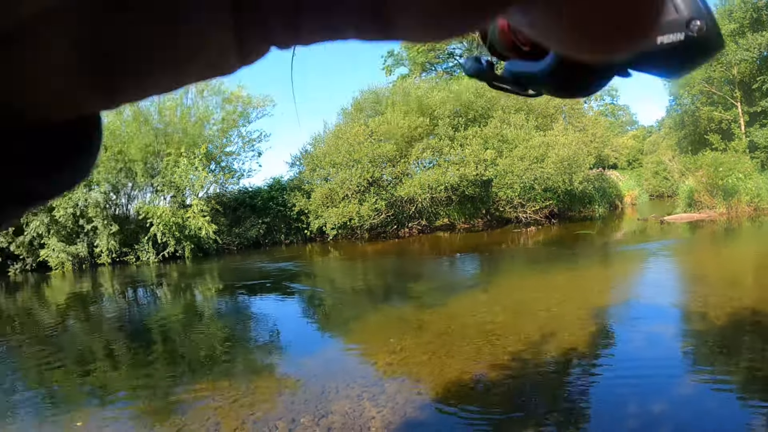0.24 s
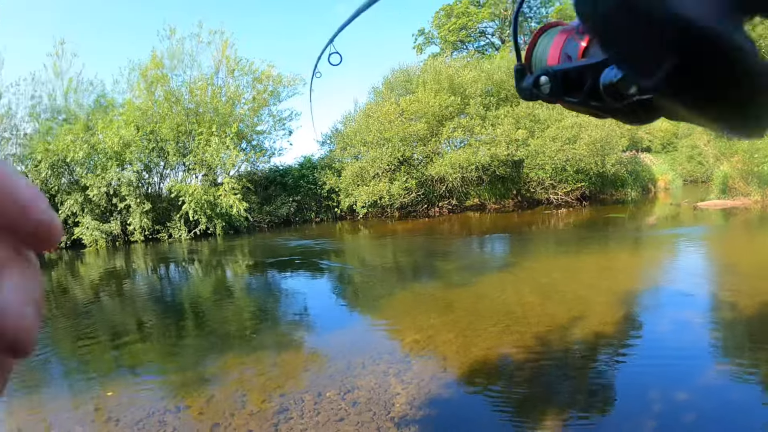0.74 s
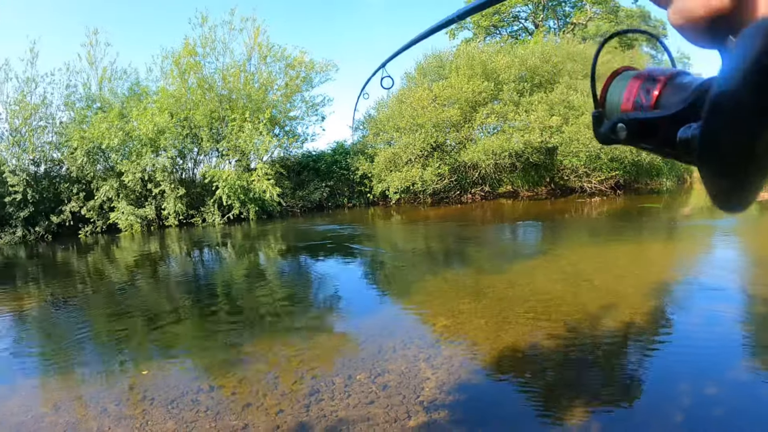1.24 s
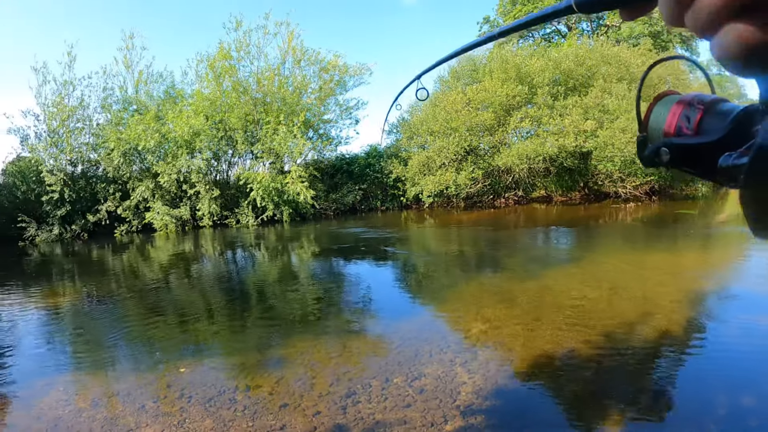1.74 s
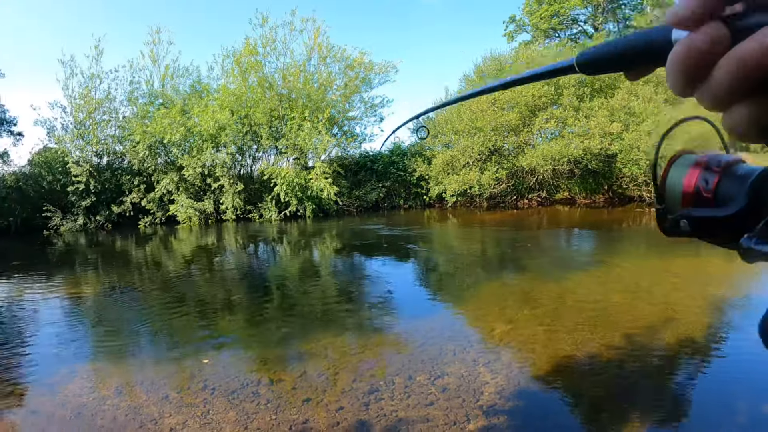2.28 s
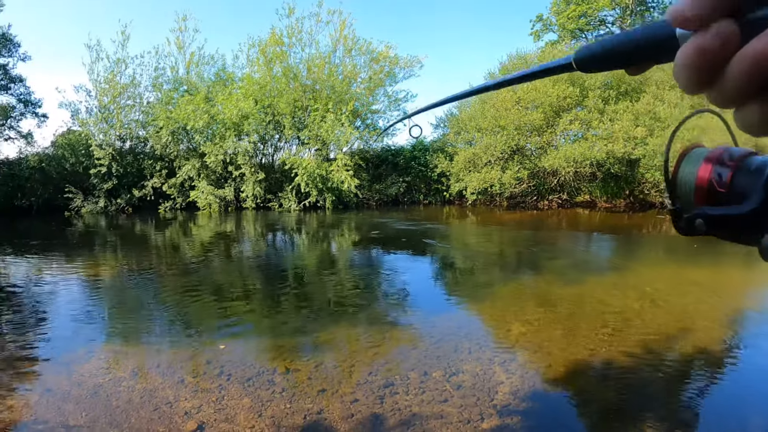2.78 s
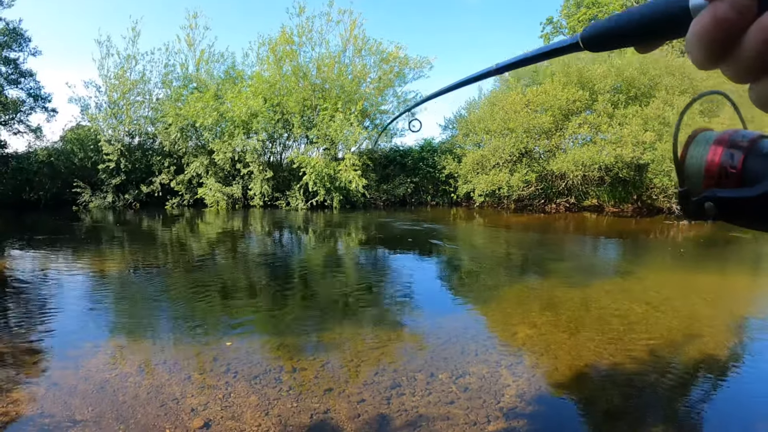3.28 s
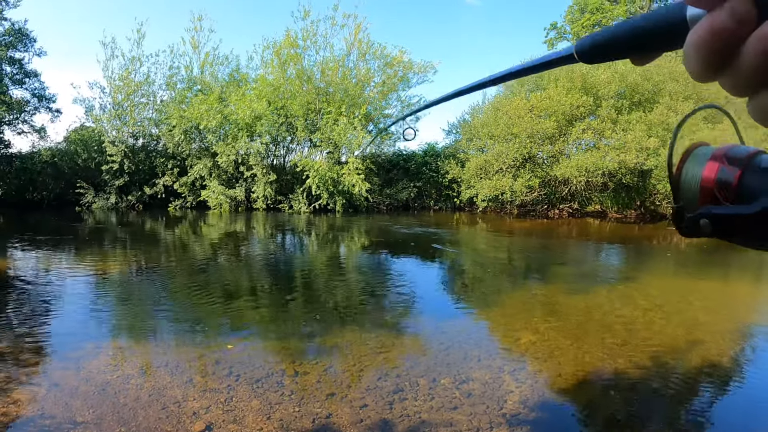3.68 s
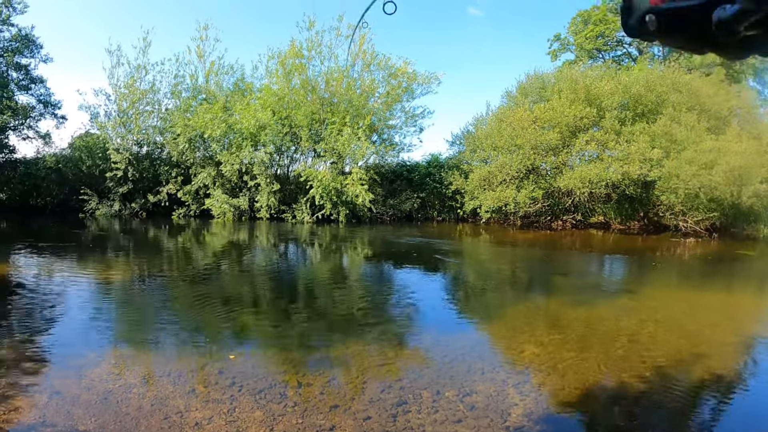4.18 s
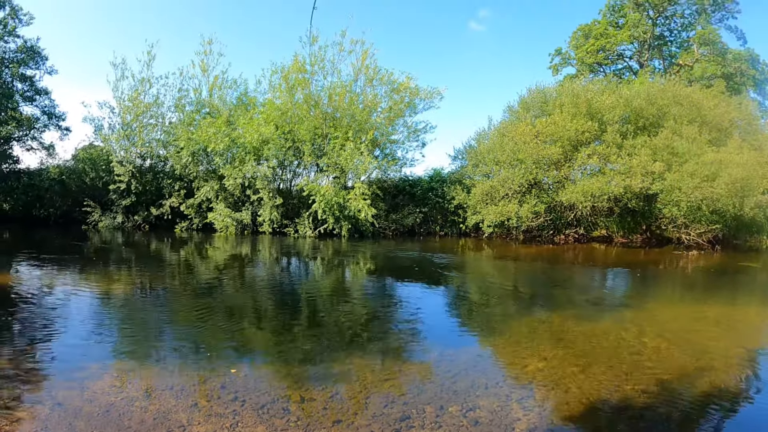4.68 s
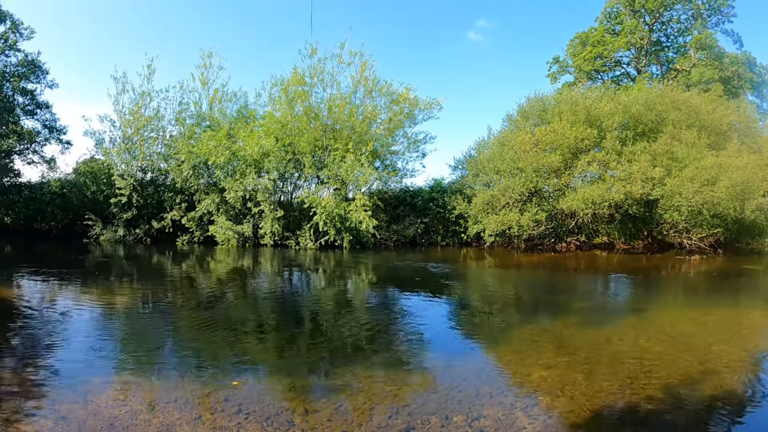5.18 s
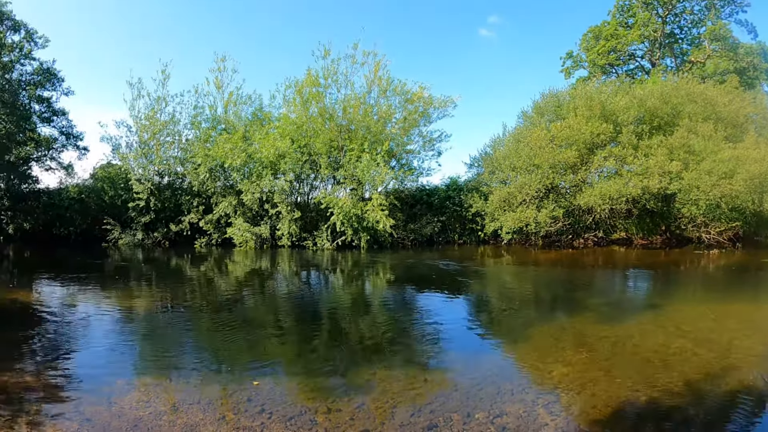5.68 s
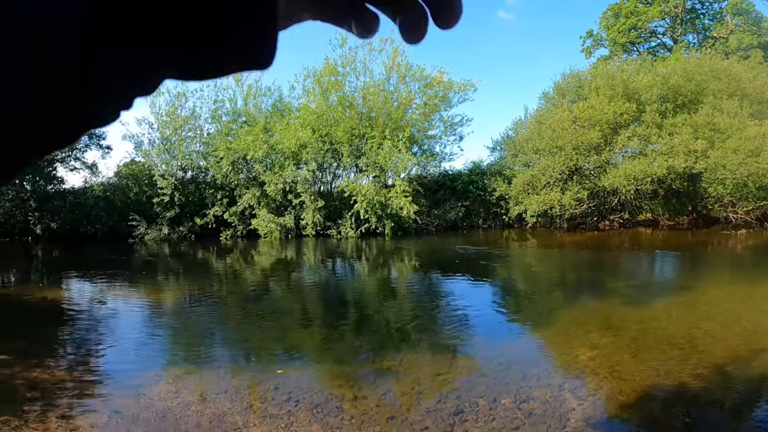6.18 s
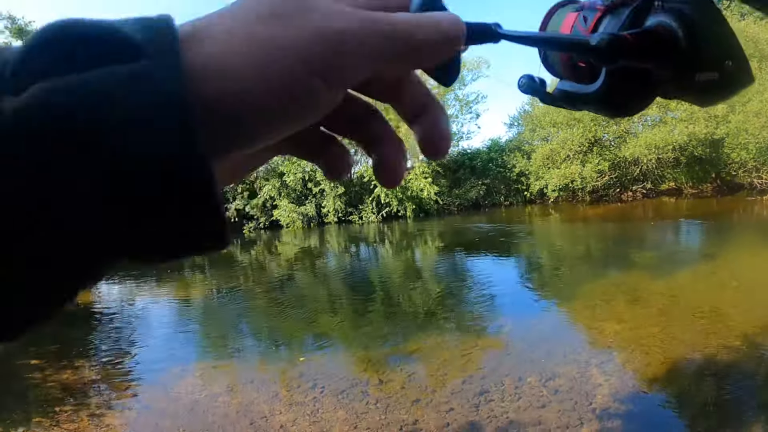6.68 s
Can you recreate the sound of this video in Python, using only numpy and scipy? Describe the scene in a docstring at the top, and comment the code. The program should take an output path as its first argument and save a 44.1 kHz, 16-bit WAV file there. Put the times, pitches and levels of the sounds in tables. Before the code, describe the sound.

A fishing reel's drag clicks right at the microphone from the start, in two quick bursts of crisp, metallic ratcheting with a light sleeve rustle. Hands knock the tackle at about 0.5 seconds. From 1.1 to 3.9 seconds a fish takes line in a dozen short pulls, the spool ringing thinly and the clicks speeding into a whirring buzz near 2, 2.5, 3.1 and 3.8 seconds. Single ticks and small knocks fall between pulls. The reel rests from 4 to almost 6 seconds, leaving the faint shallow river and breeze in leaves that lie underneath throughout. Two thin, very faint bird calls come from far away just after 4 seconds. Sharp knocks on the rod cluster around 5.7 seconds, the loudest at 5.8. Ratcheting resumes from 6 to 6.7 seconds with sleeve rubbing, ending in a quick buzz. Soft, low thumps occasionally nudge the chest-worn microphone.

```python
"""A spinning reel's drag clicks and buzzes close by, pull after pull, as a hooked fish takes line.
The pawl snaps over the teeth of the metal spool, which rings, and whirrs on its washers when fast.
Hands knock the tackle, a sleeve rubs, and the chest camera that hears it all thumps on its harness.
Behind are a shallow river, a light breeze in the leaves and two calls of a far bird."""
import sys
import numpy as np
from scipy import signal
from scipy.fft import rfft, irfft
from scipy.io import wavfile
from scipy.ndimage import uniform_filter1d, map_coordinates

SR = 44100
rng = np.random.default_rng(int(sys.argv[2]) if len(sys.argv) > 2 else 0)


def generate_wav(sig):
    """Save sig (samples, or channels by samples) to the path in sys.argv[1] as 16-bit PCM at SR."""
    pcm = np.round(np.clip(np.atleast_2d(sig).T, -1, 1) * 32767).astype(np.int16)
    wavfile.write(sys.argv[1], SR, pcm)


N = 305613
TIME = np.arange(N) / SR
FREQS = np.fft.rfftfreq(N, 1 / SR)
SIDES = np.array([[.5], [-.5]])  # left, right


# reel facing the camera: (time [s], treble gain [dB])
REEL_FACING = [(0, 8), (.4, -3.5), (1.0, -1), (1.5, -2.5), (3.1, 2), (3.9, -3), (5.95, -3), (6.45, 5.5)]

def reel(treble_hz=8300):
    """Pawl, ring and whirr; brighter when the spool faces the camera."""
    snaps, speed = drag_teeth()
    sound = pawl(snaps) + spool_ring(snaps) + whirr(snaps, speed)
    highpass = 1 - 1 / (1 + (FREQS / treble_hz) ** 4)
    treble = irfft(rfft(sound) * highpass, N)
    return sound + (undb(curve(REEL_FACING)) - 1) * treble


# single teeth slipping between pulls: (time [s], snap [dB], low ring [dB], high ring [dB])
SLIPS = [(0.7539, -24, -32, -47.5), (1.0502, -24, -36, -58), (2.4172, -28.5, -46, -44.5),
         (2.668, -27, -36.5, -45), (2.706, -29.5, -33.5, -49), (3.3583, -30, -55, -49),
         (3.445, -28.5, -41.5, -38), (3.95, -40, -55, -45.5), (5.9476, -26, -45.5, -62),
         (5.9948, -27, -48, -60)]
# pulls of the fish: (start [s], turn [s], end [s], speed at each of the three [teeth/s],
# first snap [dB], last snap [dB], low ring [dB], high ring [dB])
FISH_PULLS = [ (.0148, .047, .157, 27.3, 35.8, 36.7, -27.5, -25.5, -35, -45),
              (.1801, .272, .3736, 48.4, 106.5, 60, -23.5, -26.5, -39.5, -44),
              (1.131, 1.211, 1.3503, 19.8, 47, 20.8, -23.5, -28, -39.5, -44),
              (1.3878, 1.499, 1.5849, 24, 21.2, 38.6, -25, -26, -39, -46),
              (1.6107, 1.678, 1.7427, 43.7, 52, 35.3, -24.5, -27.5, -41, -44),
              (1.7766, 1.833, 1.9405, 30.2, 51.3, 22.5, -24.5, -26.5, -39.5, -47),
              (1.9916, 2.018, 2.124, 60, 197, 57, -22.5, -28, -38.5, -42),
              (2.2529, 2.264, 2.3688, 73, 112.5, 48.6, -23.5, -27.5, -41, -45),
              (2.5093, 2.529, 2.625, 75, 160, 46, -23.5, -27.5, -37.5, -44),
              (2.7763, 2.789, 2.8473, 66, 92.5, 24.7, -29, -27, -35.5, -44),
              (3.0303, 3.087, 3.147, 55, 276, 55, -25, -25.5, -41, -42.5),
              (3.1665, 3.255, 3.2965, 48.6, 40, 16.4, -27, -27, -37, -40),
              (3.549, 3.61, 3.704, 24, 44.2, 63, -27.5, -24, -39, -43),
              (3.7755, 3.817, 3.9028, 33, 258, 33.7, -23.5, -25, -33, -41),
              (6.0287, 6.124, 6.1959, 23.5, 19, 40.8, -26.5, -30, -43, -51),
              (6.2338, 6.275, 6.3222, 30.5, 40.8, 26, -29, -28.5, -37.5, -52),
              (6.3909, 6.4266, 6.4523, 24, 33, 44.8, -31, -32.5, -43, -48),
              (6.4709, 6.572, 6.6676, 52, 146, 66.2, -25, -24, -43, -41.5), ]

def drag_teeth(db_per_octave=.7, snap_scatter_db=1.0, ring_scatter_db=2.6):
    """Faster teeth hit harder. Returns all snaps (columns as SLIPS) and spool speed [teeth/s]."""
    rows, speed = [np.array(SLIPS)], np.zeros(N)
    for start, turn, end, *rates, first_db, last_db, low_db, high_db in FISH_PULLS:
        turning = (TIME >= start) & (TIME <= end)
        speed[turning] = np.exp(np.interp(TIME[turning], [start, turn, end], np.log(rates)))
        passed = np.cumsum(speed[turning]) / SR
        tooth = np.linspace(0, passed[-1], round(passed[-1]) + 1)
        times = np.interp(tooth, passed, TIME[turning])
        rate = np.interp(tooth, passed, speed[turning])
        force_db = db_per_octave * np.log2(rate / rate.mean())
        snap_db = np.interp(times, [start, end], [first_db, last_db])
        snap, low, high = rng.standard_normal((32, 3))[:len(times)].T
        rows.append(np.column_stack([times, snap_db + force_db + snap_scatter_db * snap,
                                     low_db + force_db + ring_scatter_db * low,
                                     high_db + force_db + ring_scatter_db * high]))
    rows = np.vstack(rows)
    return rows[np.argsort(rows[:, 0])], speed


# pawl and housing modes: (frequency [Hz], relative level [dB], t60 [s])
PAWL_MODES = [(1681, -10.5, 0.017), (4263, -8.5, 0.019), (5035, -1, 0.016), (6190, 0, 0.007),
              (6620, -0.5, 0.0039), (7670, -3, 0.0038), (8600, -15, 0.0054), (10660, -12, 0.0074)]
# pawl hitting a tooth: (frequency [Hz], level [dB])
CRACK_SPECTRUM = [(200, -46), (900, -12.5), (1600, 0.5), (2700, -3), (4000, 1.5), (6200, 5), (8000, -1.5),
                  (11000, -4), (13000, -9.5), (15500, -19)]

def pawl(snaps, modes_db=-3, crack_db=1, crack_t60=.0059, rise_s=.00022, bounce_s=.00105, bounce=.22):
    """Each snap is a crack and a short ring of the housing; the pawl bounces once as it lands."""
    last, age = since(snaps[:, 0])
    scatter_db, detune, energy_window_s = 2.8, .009, .003
    body = np.zeros(N)
    for hz, db, t60 in PAWL_MODES:
        size, pitch, phase = rng.standard_normal((256, 3))[last].T
        mode = np.sin(2 * np.pi * hz * (1 + detune * pitch) * age + np.pi * phase)
        body += undb(db + scatter_db * size) * fade(age, t60) * mode
    # teeth differ in colour, but the spring stores a set energy for each
    energy = np.bincount(last, body ** 2) / (SR * energy_window_s)
    body /= np.sqrt(energy[last] + 1e-12)
    bounce_age = age - bounce_s * rng.uniform(.5, 1.5, 256)[last]
    contact = fade(age, crack_t60) + bounce * (bounce_age > 0) * fade(abs(bounce_age), crack_t60)
    crack = undb(crack_db) * contact * stereo_noise(CRACK_SPECTRUM, spread=.31)
    attack = 1 - np.exp(-age / rise_s)
    return undb(snaps[last, 1]) * attack * (undb(modes_db) * body + crack)


# spool modes: (frequency [Hz], level re drive [dB], t60 [s])
SPOOL_MODES = [(4305, -.5, .14), (6628, -1, .27), (10778, -24, .11), (13228, -35, .1)]

def spool_ring(snaps, scatter_db=4.5, nudge_rad=.844):
    """The spool rings like a small bell; each tooth resets its strength and nudges its phase."""
    last, age = since(snaps[:, 0])
    _, snap_db, low_db, high_db = snaps.T
    *kicks, scatter_a, scatter_b = rng.standard_normal((256, 6))[:len(snaps)].T
    drives_db = [low_db, high_db, snap_db + scatter_db * scatter_b, snap_db + scatter_db * scatter_a]
    out = np.zeros(N)
    for (hz, db, t60), drive_db, kick in zip(SPOOL_MODES, drives_db, kicks):
        phase = 2 * np.pi * hz * TIME + nudge_rad * np.cumsum(kick)[last]
        out += undb(db + drive_db)[last] * fade(age, t60) * np.sin(phase)
    return out


# spool on its drag washers: (frequency [Hz], level [dB])
WHIRR_SPECTRUM = [(150, -54), (550, -1.5), (800, -10), (940, 1), (1150, -8), (1720, 1), (2150, -6),
                  (3000, -8), (4400, -6), (6300, -3), (8500, -11.5), (11000, -13.5), (13000, -31),
                  (15500, -48)]

def whirr(snaps, speed, rub_db=-40.5, rattle_db=-21, rattle_t60=.084, coast_s=.013):
    """Above slip speed the washers rub, harder when faster; loose parts rattle after each tooth."""
    slip_speed, reference_speed = 55, 100  # teeth/s
    last, age = since(snaps[:, 0])
    sliding = np.sqrt(np.maximum(speed - slip_speed, 0) / reference_speed) + 1e-9
    pole = np.exp(-1 / (coast_s * SR))
    rub = undb(rub_db) * signal.lfilter([1 - pole], [1, -pole], sliding)
    rattle = undb(snaps[last, 1] + rattle_db) * fade(age, rattle_t60)
    return np.hypot(rub, rattle) * stereo_noise(WHIRR_SPECTRUM, spread=.26)


# hand and tackle knocks: (time [s], level [dB], brightness [dB])
TACKLE_KNOCKS = [(.497, -21.5, 4.5), (0.533, -24, 8), (.541, -25, 3), (.580, -42, -9), (2.849, -28, -1),
                 (3.868, -27.5, -3), (3.974, -26.5, 1), (5.292, -41, -7.5), (5.701, -24, -3),
                 (5.778, -27.5, 3), (5.787, -24.5, -0.5), (5.8308, -15, 3.5), (6.2366, -22.5, 5.5),
                 (6.383, -35, -8.5), (6.775, -40, 2)]
# dull body and bright edge of a knock: (frequency [Hz], level [dB])
BODY_SPECTRUM = [(80, -22.5), (400, -6.5), (950, -1), (1300, 0.5), (1700, 3), (2300, -1), (3200, -14),
                 (6000, -16), (15000, -53)]
EDGE_SPECTRUM = [(500, -2), (2500, -2.5), (4200, 9), (5200, 0), (6800, -1.5), (9000, -19), (15000, -43)]

def knocks(body_t60=.025, edge_t60=.011, rise_s=.00012):
    """Fingers and handle knock on the rod: a bright edge over a dull plastic body."""
    times, db, bright_db = np.transpose(TACKLE_KNOCKS)
    last, age = since(times)
    body = undb(db - bright_db)[last] * fade(age, body_t60) * noise(BODY_SPECTRUM)
    edge = undb(db + bright_db / 2)[last] * fade(age, edge_t60) * noise(EDGE_SPECTRUM)
    return (1 - np.exp(-age / rise_s)) * (body + edge) / 2


# tackle at the microphone ports: (frequency [Hz], left minus right [dB], left lead [rad])
PORT_RESPONSE = [(700, -1, -0.26), (1660, -3, -0.48), (3000, -8.5, -1.23), (4300, -4, -0.4),
                 (5330, -2.5, -0.49), (6350, -3.5, 0.43), (7300, 0.5, 0.49), (9800, 0, 0.12),
                 (12000, 2, 0.79), (14900, -1, 0.35)]

def camera_ports(sound, echo_db=-14, echo_t60=.0048):
    """The camera body shades its two ports differently; chest and arms add short reflections."""
    pan_db, lead_rad = spectra(PORT_RESPONSE)
    shading = undb(SIDES * pan_db) * np.exp(1j * SIDES * lead_rad)
    echoes = rng.standard_normal((2, 1024)) * fade(TIME[:1024], echo_t60)
    echoes *= undb(echo_db) / np.linalg.norm(echoes, axis=1, keepdims=True)
    return irfft(rfft(sound) * shading * (1 + rfft(echoes, N)), N)


# arm strokes: (fastest moment [s], half length [s], level [dB], top weave pitch [Hz])
ARM_STROKES = [(.09, .025, -55, 600), (.21, .1, -44, 1101), (.33, .035, -53, 580), (.55, .03, -50, 1199),
               (5.679, .13, -64, 1102), (6.19, .09, -45, 1949), (6.331, .05, -54, 1749),
               (6.43, .04, -40.5, 1611), (6.57, .03, -45.5, 2650), (6.793, 0.059, -58, 890.8)]
# rubbed weave: (multiple of its pitch [ratio], level [dB])
WEAVE_SPECTRUM = [(.1, -9.5), (.4, -11.5), (.84, -4.5), (1, 6), (1.15, -4), (2, -10.5), (3.5, -26),
                  (9, -52)]
# fibre hiss: (frequency [Hz], level [dB])
FIBRE_SPECTRUM = [(1000, -18), (2600, -13), (4800, 3.5), (7000, -8), (11000, -13), (15000, -25)]

def sleeve(pitch_exponent=.22, waver=.04, grain_db=3, pan_db=1, hiss_db=-19, spread=.22):
    """Ribbed cloth slides in small jerks; level and pitch follow the speed of the arm."""
    peak_s, half_s, db, top_hz = np.transpose(ARM_STROKES)[:, :, None]
    arm_speed = np.exp(-((TIME - peak_s) / half_s) ** 2) + 1e-4
    stroke_gains = undb(db) * arm_speed
    gain = stroke_gains.sum(axis=0)
    pitch_hz = (stroke_gains * top_hz * arm_speed ** pitch_exponent).sum(axis=0) / gain
    # noise pitched at base_hz, read at varying speed
    base_hz = 1000
    cloth = stereo_noise([(ratio * base_hz, level) for ratio, level in WEAVE_SPECTRUM], spread)
    position = np.cumsum(pitch_hz * (1 + waver * wander(rate_hz=25)) / base_hz) % (N - 1)
    rub = np.array([map_coordinates(channel, [position], order=3) for channel in cloth])
    grain = undb(grain_db * wander(rate_hz=120))
    hiss = undb(hiss_db) * stereo_noise(FIBRE_SPECTRUM, spread)
    return gain * grain * undb(SIDES * pan_db) * (rub + hiss)


# harness jolts: (time [s], level [dB])
JOLTS = [(.29, -50), (.62, -50), (1.05, -52), (1.89, -55), (2.74, -55), (3.17, -51), (4.01, -54),
         (4.878, -53), (5.32, -55), (6.6, -51)]

def harness_thumps(hz=42, width_s=.021, trim_db=-1, sway_db=-79, flutter_db=5):
    """The camera sways on its harness: a faint uneven rumble, and a few slow cycles at each jolt."""
    jolts = np.zeros(N)
    for time_s, db in JOLTS:
        envelope = undb(db + trim_db) * np.exp(-((TIME - time_s) / width_s) ** 2)
        jolts += envelope * np.cos(2 * np.pi * hz * (TIME - time_s) + rng.uniform(0, 2 * np.pi))
    sway = undb(sway_db + flutter_db * wander(rate_hz=20))
    return jolts + sway * noise([(hz / 2, -12), (hz, 0), (2 * hz, -14), (10 * hz, -70)])


# water and high hiss: (frequency [Hz], level [dB])
RIVER_SPECTRUM = [(20, -3), (40, -2), (58, -10), (85, -37), (115, -24.5), (155, -4.5), (290, 0.5),
                  (545, -2), (780, -3.5), (1260, -4), (2160, -10), (3300, -19), (4700, -15.5), (7000, -23),
                  (9000, -36.5), (15000, -42.5)]
# stereo width: (frequency [Hz], side minus mid [dB])
RIVER_WIDTH = [(40, -6.5), (250, -12), (1000, -8.5), (3000, -8), (10000, -6)]
# balance: (frequency [Hz], left minus right [dB])
RIVER_BALANCE = [(40, -2.5), (150, -4), (500, 3), (1200, 6.5), (3000, 4.5), (10000, 1.5)]
# slow swell of the water: (time [s], gain [dB])
WATER_SWELL = [(0, -4), (.65, 2.5), (1.3, 2), (2.2, 2), (3.4, 0.5), (4.3, 3), (4.75, 1), (5.6, 4.5),
               (6.93, 3.5)]
# high hiss: sleeve rustle at the start, then a light breeze in the leaves: (time [s], gain [dB])
HISS_SWELL = [(0, 16), (.95, -1), (1.3, 5.5), (3.4, 4), (4.53, 3.5), (4.8, -0.5), (5.6, 7.5), (6.93, 3.5)]

def river_and_hiss(gain_db=-57.5, ripple_db=2, hiss_above_hz=2500):
    """Water over shallows under a hiss of sleeve, then leaves; each octave ripples on its own."""
    mid = rfft(noise(RIVER_SPECTRUM))
    side = rfft(noise(RIVER_SPECTRUM)) * undb(spectra(RIVER_WIDTH)[0])
    stereo = (mid + 2 * SIDES * side) * undb(SIDES * spectra(RIVER_BALANCE)[0])
    out = np.zeros((2, N))
    for hz in 20 * 2 ** np.arange(11):
        octave = np.maximum(1 - abs(np.log2((FREQS + 1) / hz)), 0)
        swell_db = curve(HISS_SWELL if hz > hiss_above_hz else WATER_SWELL)
        out += irfft(stereo * octave, N) * undb(swell_db + ripple_db * wander(rate_hz=18))
    return undb(gain_db) * out


# bird calls: (time [s], length [s], start pitch [Hz], end pitch [Hz], level [dB])
BIRD_CALLS = [(4.11, .06, 4200, 5130, -64), (4.32, 0.072, 4700, 4130, -64)]

def bird(blur=.031):
    """Two thin gliding calls from the far bank, blurred by the trees."""
    out = np.zeros(N)
    for time_s, length_s, start_hz, end_hz, db in BIRD_CALLS:
        progress = np.clip((TIME - time_s) / length_s, 0, 1)
        hz = (start_hz + (end_hz - start_hz) * progress) * (1 + blur * wander(rate_hz=400))
        out += undb(db) * np.sin(np.pi * progress) * np.sin(2 * np.pi * np.cumsum(hz) / SR)
    return out


def undb(db):
    """Decibels to gain."""
    return 10 ** (np.asarray(db) / 20)


def unit_rms(x):
    """Scale to rms 1."""
    return x / np.sqrt(np.mean(x ** 2))


def curve(rows):
    """(time [s], value) rows, interpolated per sample."""
    return np.interp(TIME, *np.transpose(rows))


def spectra(rows):
    """Value columns of a table, interpolated over log frequency."""
    hz, *columns = np.transpose(rows)
    return [np.interp(np.log(FREQS + 1), np.log(hz), column) for column in columns]


def noise(shape):
    """Noise of rms 1 shaped by (frequency [Hz], level [dB]) rows."""
    return unit_rms(irfft(rfft(rng.standard_normal(N)) * undb(spectra(shape)[0]), N))


def stereo_noise(shape, spread):
    """Shaped noise; spread 0 gives equal channels, 1 unrelated ones."""
    return (noise(shape) + 2 * spread * SIDES * noise(shape)) / np.hypot(1, spread)


def wander(rate_hz):
    """Ramps between random values, rms 1."""
    hold = int(SR / rate_hz)
    steps = np.repeat(rng.standard_normal(N // hold + 1), hold)
    return unit_rms(uniform_filter1d(steps, hold)[:N])


def fade(age, t60):
    """Free decay, 60 dB in t60 seconds."""
    return np.exp(-np.log(1000) * age / t60)


def since(times):
    """Per sample: index of the latest hit and its age [s]."""
    last = np.maximum(np.searchsorted(times, TIME, side="right") - 1, 0)
    return last, np.where(TIME < times[0], 10, TIME - times[last])


def scene():
    """Reel and angler close by; river, leaves and bird behind."""
    tackle = camera_ports(reel() + knocks())
    return tackle + sleeve() + harness_thumps() + river_and_hiss() + bird()


def record(dry):
    """The camera's treble rolls off and ends steeply."""
    rolloff_hz, cutoff_hz = 13900, 16400
    soft = signal.sosfilt(signal.butter(10, rolloff_hz, fs=SR, output="sos"), dry)
    return signal.sosfilt(signal.ellip(8, .2, 70, cutoff_hz, fs=SR, output="sos"), soft)


dry = scene()
out = record(dry)
generate_wav(out)
```